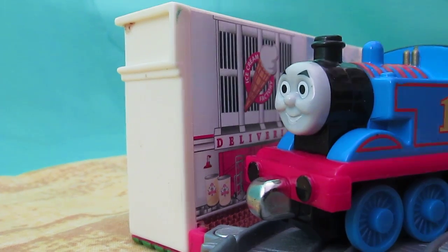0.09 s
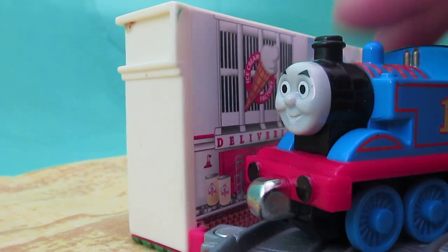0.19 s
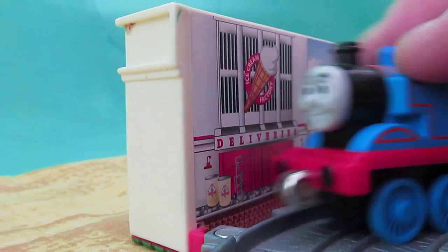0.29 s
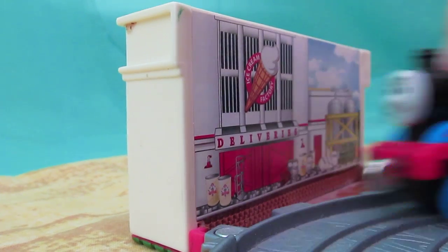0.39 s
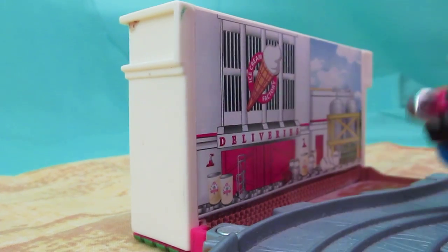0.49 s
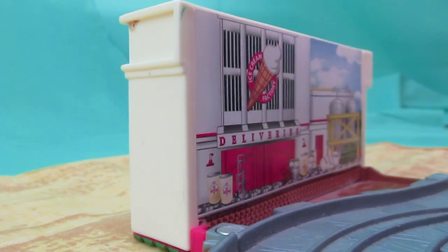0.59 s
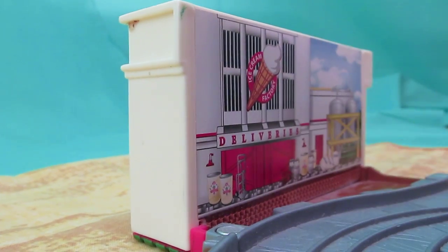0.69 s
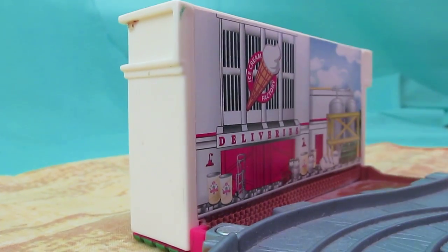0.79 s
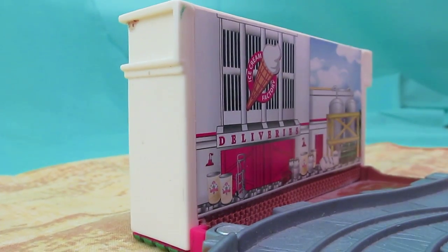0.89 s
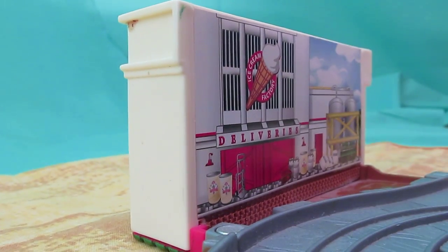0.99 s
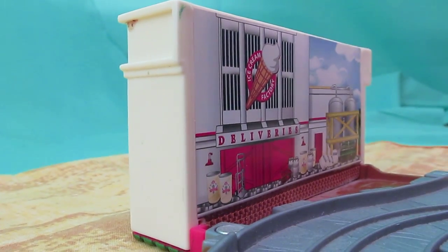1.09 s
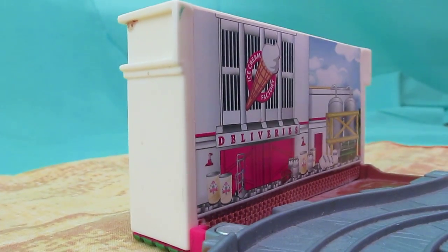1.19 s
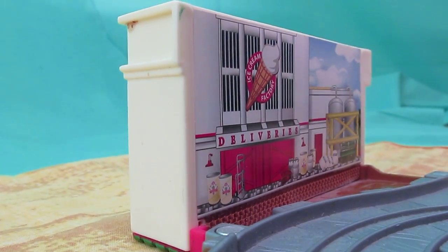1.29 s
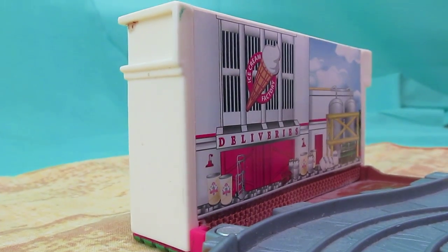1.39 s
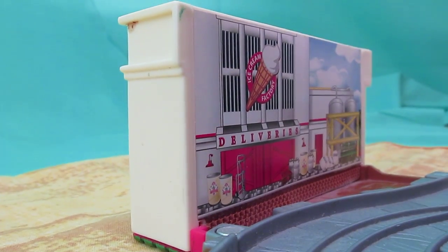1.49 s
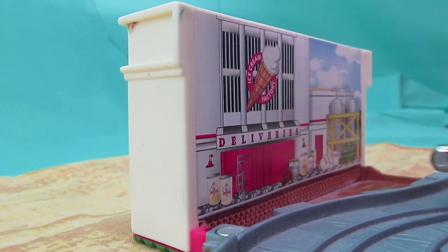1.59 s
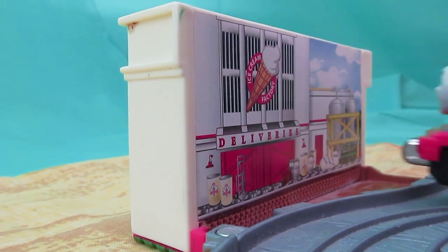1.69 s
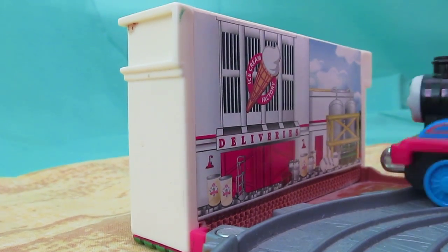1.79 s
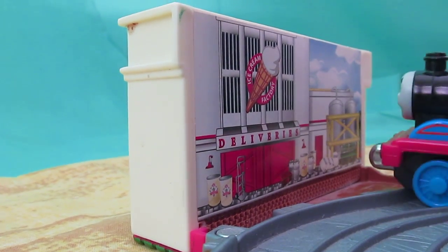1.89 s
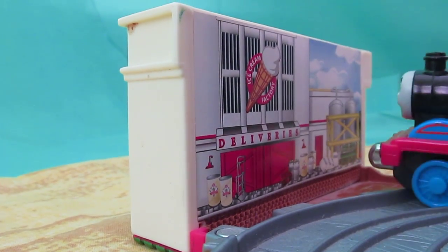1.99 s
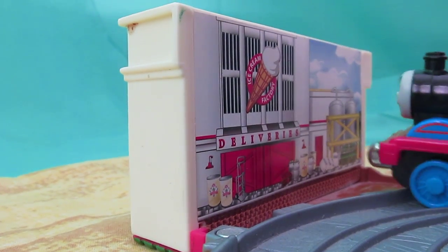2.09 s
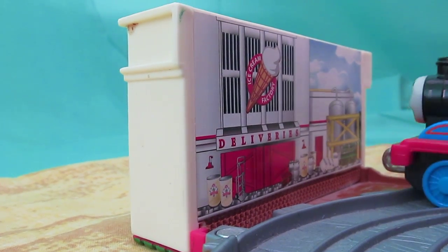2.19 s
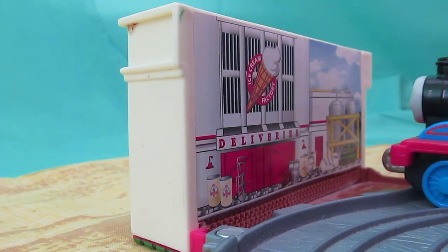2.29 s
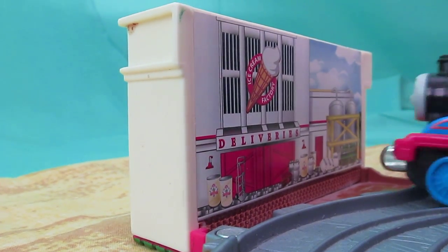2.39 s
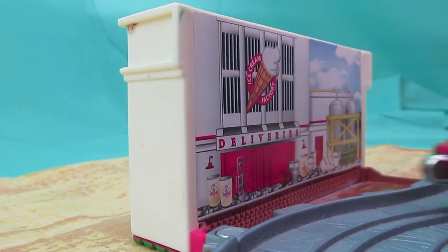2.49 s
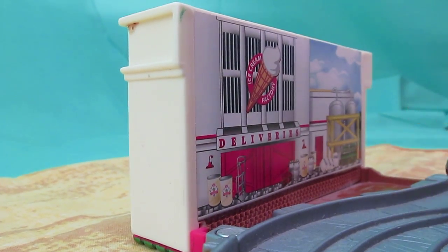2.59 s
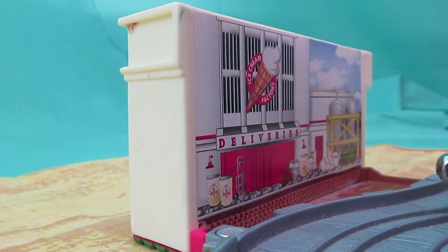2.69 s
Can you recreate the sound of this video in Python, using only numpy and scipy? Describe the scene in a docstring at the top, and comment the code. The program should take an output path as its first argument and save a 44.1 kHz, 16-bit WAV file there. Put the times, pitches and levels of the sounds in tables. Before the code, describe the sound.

Small plastic toy engine clicks and rattles over plastic track in short bursts, close and dry

```python
"""Toy engine on plastic track

A hand rolls a small plastic toy engine to and fro over plastic track on a table, close to the microphones.
Wheels and couplings click and rattle in short bursts: contacts ring damped modes of the plastic body,
with noise cracks and a thin metal ring in the treble. Thuds and rumble ring the modes of the table.
Below lie a faint room echo, band-filtered room noise of changing level and a mains hum of two sines."""
import sys
import numpy as np
from scipy import signal
from scipy.fft import rfft, irfft, next_fast_len
from scipy.io import wavfile

SR = 44100
rng = np.random.default_rng(int(sys.argv[2]) if len(sys.argv) > 2 else 0)


def wav_record(signal):
    """Record a signal, one row per channel, as 16-bit PCM in the file named by sys.argv[1]."""
    frames = np.transpose(np.atleast_2d(signal))
    bounded = np.clip(frames, -1, 1)
    # unit amplitude maps onto the largest positive 16-bit level
    quanta = np.round(bounded * 32767).astype(np.int16)
    wavfile.write(sys.argv[1], SR, quanta)


def voltage_ratio(decibels):
    """Convert decibels (scalar or array-like) to amplitude ratios, 20 dB per decade."""
    exponent = np.asarray(decibels, float) / 20
    return 10 ** exponent


N = 121275

# background level: t/s, level/dB
BACKGROUND_LEVEL = [(0, -47), (.3, -45.5), (.62, -55.5), (.9, -58.5), (1.4, -55.5), (1.6, -46.5),
                    (1.92, -53.5), (2.4, -48), (2.55, -51), (2.75, -54)]
# room noise spectrum: f/Hz, relative density/dB
AIR_SPECTRUM = [(15, -45.5), (40, -5), (128, -5.5), (181, -11.5), (462, -15.5), (811, -22), (1670, -26),
                (3930, -34.5), (15000, -53.5)]
# left-right correlation of the room noise: f/Hz, correlation/1
AIR_CORRELATION = [(30, 0.51), (500, 0.7), (3000, 0.12), (15000, 0.084)]
# how far a band follows the background's level swing: f/Hz, share/1
SWING_SHARE = [(60, 1.4), (300, 0.97), (4000, 1.2)]
# mains hum: f/Hz, rms re background/dB
HUM_TONES = [(119, -7), (238, -14.5)]
# table top modes: f/Hz, level/dB, t60/s
TABLE_MODES = [(68, -9.5, 0.084), (130.6, 2, 0.023), (160, 6, 0.022), (229, -3.5, 0.071),
               (300, -3.5, 0.042), (370, 2.5, 0.026), (525, -4.5, 0.053), (705.5, 7, 0.013)]
# plastic body modes: f/Hz, level/dB, t60/s
BODY_MODES = [(806, -9.5, 0.0067), (1120, 4, 0.0054), (1587, 0, 0.01044), (1950, 0.5, 0.0086),
              (2280, -1.5, 0.0075), (2695, 4, 0.0073), (3120, 5, 0.0054), (4020, 8.5, 0.0033)]
# treble of the hard contacts: f/Hz, relative density/dB
CONTACT_TREBLE = [(3000, -9), (4200, 2), (5000, 0), (6400, 2), (7700, -6), (10000, -11.5), (13000, -19.5),
                  (15500, -32.5)]
# scraping and rattling: start t/s, length/s, level/dB, treble re level/dB, table rumble re level/dB
ROLL_BURSTS = [(0.249, 0.093, -37, -13, -1.5), (0.302, 0.075, -24, -11.5, -12),
               (0.373, 0.029, -28, -1.5, -17), (0.411, 0.025, -33.5, -6, -6.5),
               (0.446, 0.015, -42, 14.5, 1), (0.519, 0.038, -31, -3, -7), (0.565, 0.031, -24, -3.5, -10.5),
               (0.589, 0.033, -52, 10.5, -5.5), (0.856, 0.0064, -41, -15, -5.5),
               (1.277, 0.066, -64.5, -16, 7), (1.47, 0.083, -52, -20.5, 3.5),
               (1.561, 0.021, -38.5, -11, -7), (1.588, 0.091, -51.5, -10, -1.5),
               (1.674, 0.015, -28, -12.5, -9.5), (1.719, 0.031, -41.5, -14, 0.5),
               (1.758, 0.041, -28, -8.5, -9), (1.819, 0.039, -28, -5, -8), (1.869, 0.031, -41.5, -14, -5.5),
               (2.09, 0.1, -65, -20, 10), (2.137, 0.0076, -22, -10.5, -14.5),
               (2.18, 0.023, -34.5, -4.5, -5), (2.319, 0.0098, -44.5, -10.5, 1),
               (2.363, 0.039, -42.5, -18, -1), (2.421, 0.034, -33.5, -15, -8.5),
               (2.446, 0.015, -21.5, -12.5, -27), (2.47, 0.037, -34, -17.5, -8.5),
               (2.538, 0.014, -40.5, -21, -6), (2.696, 0.0081, -26, -17, -11)]
# thuds into the table: t/s, level/dB, favoured f/Hz
TABLE_THUDS = [(0.207, -21, 120), (0.244, -17.5, 230), (0.249, -24, 68), (0.278, -26, 223),
               (0.319, -32, 300), (0.374, -22.5, 149), (0.4405, -22.5, 644), (0.525, -31.5, 382.6),
               (0.574, -27, 370), (1.566, -25.5, 525), (1.576, -25, 525), (1.677, -29, 300),
               (1.724, -29, 360), (1.784, -23, 396), (1.84, -19, 143.5), (2.143, -28.5, 533),
               (2.189, -32.5, 485), (2.325, -31, 362), (2.453, -18, 137), (2.648, -35.5, 319),
               (2.70, -31.5, 324.4), (2.742, -37.5, 330)]
# single knocks: t/s, level/dB, favoured f/Hz, treble re level/dB
SINGLE_KNOCKS = [(0.264, -21.5, 2448, -31.5), (0.278, -17, 2470, -40.5), (0.292, -19.5, 2300, -31.5),
                 (0.301, -16, 2586, -24.5), (0.309, -8.5, 2180, -27.5), (0.322, 0, 2700, -22.5),
                 (0.328, -20.5, 2170, -20.5), (0.337, -11.5, 2460, -30), (0.341, -8.5, 2350, -35.5),
                 (0.349, -7.5, 2620, -29.5), (0.36, -13.5, 2750, -28.5), (0.373, -9.5, 2440, -25.5),
                 (0.386, -10.5, 2860, -21.5), (0.524, -22, 2060, -23), (0.529, -18.5, 2487, -3),
                 (0.535, -22.5, 3860, 0), (0.542, -16, 2310, -8.5), (0.575, -4, 2280, -6.5),
                 (0.6, -10.5, 3370, -29), (0.695, -22, 1935, -26), (1.439, -36.5, 1572, -10),
                 (1.672, -13.5, 1950, -43), (1.678, -7, 2120, -28.5), (1.682, -13.5, 2060, -20.5),
                 (1.724, -14, 1950, -23), (1.741, -22.5, 2700, -35), (1.762, -11.5, 2880, -39),
                 (1.765, -6.5, 2830, -26.5), (1.767, -3, 2600, -17.5), (1.812, -23, 1930, -42),
                 (1.827, -15, 1990, -19), (1.851, -9, 1977, -15), (1.876, -15, 1620, -30.5),
                 (1.882, -17, 2800, -40.5), (2.125, -22.5, 2396, -43.5), (2.142, -8, 2380, -22),
                 (2.174, -21, 2440, -49), (2.325, -18.5, 2490, -33), (2.372, -14, 2040, -35),
                 (2.382, -13.5, 2220, -23.5), (2.418, -31, 2000, -5.5), (2.434, -17.5, 2400, -21.5),
                 (2.461, -6, 1830, -26), (2.473, -2, 2977, -14), (2.492, -13, 1950, -25),
                 (2.54, -23, 1530, -30), (2.547, -23.5, 1050, -13.5), (2.682, -34, 1750, -35),
                 (2.702, -20.5, 1720, -22)]
# hard, abrupt hits: t/s, level/dB, favoured f/Hz, treble re level/dB
HARD_CLACKS = [(0.2065, -17, 2700, -14), (0.2448, -12, 3230, -30), (0.377, 1, 3180, -24),
               (0.4405, -2.5, 2500, -13.5), (0.5864, -6.5, 2460, -4), (0.887, -43.5, 1600, -27),
               (1.5645, -15, 2870, -26), (1.57, -11, 2130, -29), (1.5755, -7, 3030, -18),
               (2.189, -10, 1950, -21), (2.451, -11, 4000, -13), (2.467, -2, 2830, -32)]
# microphone level difference: f/Hz, left minus right/dB
LEFT_RIGHT_LEVEL = [(60, 2), (150, -14.5), (400, -3.5), (1200, -7.5), (2500, -0.5), (5000, -7),
                    (14000, -11.5)]
# microphone phase difference: f/Hz, lead of the left/rad
LEFT_LEAD = [(500, 0.91), (1200, 0.58), (3000, -1.36), (5000, -3), (9000, -3.5), (15000, -10)]

ROOM_T60_S, ROOM_GAIN_DB, WALL_CORNER_HZ = 0.32, -29, 15000
PITCH_SIGMA_OCT, STRIKE_SIGMA_DB = 0.15, 3.5
CONTACT_S, CLACK_CONTACT_S = 0.0007, 0.0002
KNOCK_BODY_GAIN_DB, KNOCK_SHARE, CLACK_SHARE = -8.0, 0.17, 0.45
CRACK_T60_S, CRACK_GAIN_DB, TREBLE_CORRELATION = 0.014, 3.5, 0.49
AXLE_HZ, AXLE_GAIN_DB, AXLE_T60_S = 6606, -32.5, 0.035   # thin metal ring
ROLL_ATTACK_S, ROLL_FADE_T60_S, RUMBLE_CORRELATION = 0.0059, 0.059, 1
MEDIAN_RATTLES_PER_S, RATTLE_SCALE_DB = 1300, 2.4
CEILING = 1.7


def rms_one(x):
    """Scales to rms 1."""
    return x / np.sqrt(np.mean(x ** 2) + 1e-20)


def in_time(rows):
    """Columns of a time table at every sample."""
    s, *columns = np.transpose(rows)
    return [np.interp(np.arange(N) / SR, s, c) for c in columns]


def at_hz(points, hz):
    """A spectrum table read on a log frequency axis."""
    p = np.array(points, float)
    return np.interp(np.log(hz + 1.), np.log(p[:, 0] + 1.), p[:, 1])


def drift(pole_hz):
    """Two-pole low-passed noise of rms 1, computed at every 40th sample."""
    step = 40
    r = np.exp(-2 * np.pi * pole_hz * step / SR)
    white = rng.standard_normal(N // step + 2002)
    slow = signal.lfilter([1], [1, -2 * r, r * r], white)[2000:]   # settled part
    return np.interp(np.arange(N) / step, np.arange(len(slow)), rms_one(slow))


def sides(one, other, correlation):
    """Mid-side mix of two signals into channels of a given correlation."""
    correlation = np.clip(correlation, 0, 1)
    mid = np.sqrt(1 + correlation) * one
    side = np.sqrt(1 - correlation) * other
    return (mid + side * [[1], [-1]]) / np.sqrt(2)


def mains_hum(swing_db):
    """Steady sines whose levels drift and follow the background; 3 dB stronger on the right."""
    t = np.arange(N) / SR
    hum = 0
    for hz, db in HUM_TONES:
        hum = hum + voltage_ratio(db + 1.5 * drift(3.4) + swing_db) * np.sqrt(2) * np.sin(2 * np.pi * hz * t)
    return hum * voltage_ratio([[-1.5], [1.5]])


def background():
    """Half-octave bands of partly correlated room noise plus mains hum; each band takes its share of the swing."""
    edges = 22 * 2 ** np.arange(0, 9.6, .5)
    white = rng.standard_normal((2, 2, N))
    level_db = in_time(BACKGROUND_LEVEL)[0]
    swing_db = level_db - level_db.mean()
    air, power = 0, 0
    for k, (low, high) in enumerate(zip(edges, edges[1:])):
        bandpass = signal.butter(2, [low, high], "band", fs=SR, output="sos")
        mid, side = signal.sosfilt(bandpass, white[k % 2])
        hz = np.sqrt(low * high)
        gain = voltage_ratio(at_hz(AIR_SPECTRUM, hz) + 1.5 * drift(12))
        band = gain * sides(mid, side, at_hz(AIR_CORRELATION, hz))
        power = power + np.mean(band ** 2)
        air = air + band * voltage_ratio(at_hz(SWING_SHARE, hz) * swing_db)
    return voltage_ratio(level_db.mean()) * (air / np.sqrt(power) + mains_hum(swing_db))


def room(x):
    """Echo from eight feedback delays a side, each round softer and duller."""
    size = next_fast_len(N + SR)
    w = 2 * np.pi * np.arange(size // 2 + 1) / size
    wall = (1 / (1 + 1j * w * SR / (2 * np.pi * WALL_CORNER_HZ))) ** .5   # half a one-pole low-pass
    response = np.zeros((2, len(w)), complex)
    lags = (rng.uniform(0.0036, 0.024, 16) * SR).astype(int)
    for k, lag in enumerate(lags):
        loop = voltage_ratio(-60 * lag / SR / ROOM_T60_S) * wall * np.exp(-1j * w * lag)
        response[k % 2] += loop / (1 - loop) * (-1) ** (k // 2)
    return irfft(response * rfft(x, size), size)[:, :N]


def ring(clicks, hz, t60_s):
    """Two-pole resonator: a unit click starts a decaying sine of height 1."""
    r, w = voltage_ratio(-60 / (t60_s * SR)), 2 * np.pi * hz / SR
    return signal.lfilter([0, np.sin(w)], [1, -2 * r * np.cos(w), r * r], clicks + 1e-18)   # no denormals


def strike(at, db, modes, pitch_hz, contact_s, share):
    """Contacts ring every mode by a share, more near the favoured pitch; contact_s: pulse width at half height."""
    out = np.zeros(N)
    chance = rng.standard_normal((len(at), len(modes) + 1))
    polarity = np.sign(chance[:, -1])
    time = np.arange(0, 2 * contact_s, 1 / SR)
    pulse = np.sin(np.pi * time / (2 * contact_s)) ** 2
    for k, (hz, level_db, t60_s) in enumerate(modes):
        weight = np.exp(-.5 * (np.log2(hz / pitch_hz) / PITCH_SIGMA_OCT) ** 2) + share
        height = weight * voltage_ratio(db + level_db + STRIKE_SIGMA_DB * chance[:, k])
        clicks = np.zeros(N)
        np.add.at(clicks, at, height * polarity * (-1) ** k)
        drive = 2 * pulse * np.cos(2 * np.pi * hz * time) / (contact_s * SR)
        out += ring(np.convolve(clicks, drive)[:N], hz, t60_s)
    return out


def dying(at, db, t60_s):
    """Envelope that rises fast at each contact and decays exponentially."""
    clicks = np.zeros(N)
    np.add.at(clicks, at, voltage_ratio(db))
    decay = signal.lfilter([1], [1, -voltage_ratio(-60 / (t60_s * SR))], clicks + 1e-18)
    rise = np.exp(-1 / (CONTACT_S * SR))
    return signal.lfilter([1 - rise], [1, -rise], decay)


def treble(envelope):
    """Noise under an envelope, coloured as the hard contacts, with the axle ringing along."""
    size = next_fast_len(N)
    colour = voltage_ratio(at_hz(CONTACT_TREBLE, np.arange(size // 2 + 1) * SR / size))
    colour = colour / np.sqrt(np.mean(colour ** 2))
    puff = sides(*rng.standard_normal((2, N)), TREBLE_CORRELATION) * envelope
    crack = irfft(rfft(puff, size) * colour, size)[:, :N]
    return crack + voltage_ratio(AXLE_GAIN_DB) * ring(puff, AXLE_HZ, AXLE_T60_S)


def rattle():
    """Dense random small contacts in clumps, swelling and fading with each burst."""
    t, levels = np.arange(N) / SR, 0
    for s, length_s, db, treble_db, rumble_db in ROLL_BURSTS:
        attack = np.clip((t - s) / ROLL_ATTACK_S, 0, 1)
        fade = voltage_ratio(-60 * np.clip(t - s - length_s, 0, 1) / ROLL_FADE_T60_S)
        levels = levels + attack * fade * voltage_ratio(db + np.array([[0], [treble_db], [rumble_db]]))
    body_level, treble_level, rumble_level = levels
    rate_per_s = MEDIAN_RATTLES_PER_S * voltage_ratio(4 * drift(60))
    at = np.flatnonzero(rng.random(N) < rate_per_s / SR)
    size_db = RATTLE_SCALE_DB * np.minimum(rng.exponential(1, (4, len(at))), 3.)
    pitch_hz = 2500 * 2 ** (0.56 * rng.standard_normal(len(at)))
    body = rms_one(strike(at, size_db[0], BODY_MODES, pitch_hz, CONTACT_S / 2, 0.092))
    cracks = rms_one(dying(at, (size_db[0] + size_db[1]) / 2, CRACK_T60_S))
    rumble = [rms_one(strike(at, db, TABLE_MODES, pitch_hz / 7.5, 0.0012, 0.033)) for db in size_db[2:]]
    return (body_level * body + treble(treble_level * cracks)
            + rumble_level * sides(*rumble, RUMBLE_CORRELATION))


def thuds():
    """Soft, wide contact pulses ring the table top."""
    s, db, hz = np.transpose(TABLE_THUDS)
    return strike((s * SR).astype(int), db, TABLE_MODES, hz, 0.0013, 0.095)


def hits(rows, contact_s, share):
    """Each contact rings the body and cracks in the treble."""
    s, db, hz, treble_db = np.transpose(rows)
    at = (s * SR).astype(int)
    body = strike(at, db + KNOCK_BODY_GAIN_DB, BODY_MODES, hz, contact_s, share)
    return body + treble(dying(at, db + treble_db + CRACK_GAIN_DB, CRACK_T60_S))


def knocks():
    """Single knocks and clacks; clacks have a shorter contact and a larger share of all modes."""
    return hits(SINGLE_KNOCKS, CONTACT_S, KNOCK_SHARE) + hits(HARD_CLACKS, CLACK_CONTACT_S, CLACK_SHARE)


def two_microphones(x):
    """Toy nearer the right: the left is mostly softer and lags in the treble."""
    size = next_fast_len(N + 999)
    hz = np.arange(size // 2 + 1) * SR / size
    half = voltage_ratio(at_hz(LEFT_RIGHT_LEVEL, hz) / 2) * np.exp(.5j * at_hz(LEFT_LEAD, hz))
    return irfft(np.array([half, 1 / half]) * rfft(x, size), size)[:, :N]


def highpass(x, hz):
    """Second-order Butterworth high-pass."""
    return signal.sosfilt(signal.butter(2, hz, "high", fs=SR, output="sos"), x)


def scene():
    """The background, the room echo and the toy."""
    toy = highpass(rattle() + thuds() + knocks(), 45)
    echo = voltage_ratio(ROOM_GAIN_DB) * room(highpass(toy.mean(axis=0), 250))
    return background() + echo + two_microphones(toy)


def roll_off(x):
    """The treble ends steeply here."""
    return signal.sosfilt(signal.butter(12, 15760, fs=SR, output="sos"), x)


def record(dry):
    """Soft saturation rounds the loudest peaks, then a hard clip at full scale."""
    mix = np.clip(CEILING * np.tanh(dry / CEILING), -1, 1)
    return roll_off(mix)


dry = scene()
out = record(dry)
wav_record(out)
```